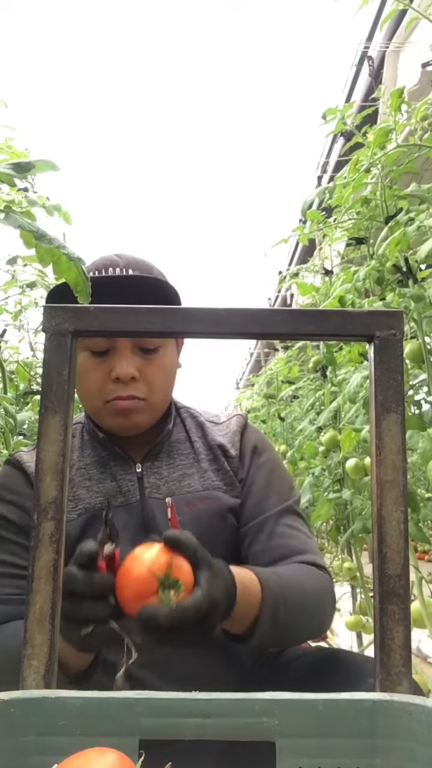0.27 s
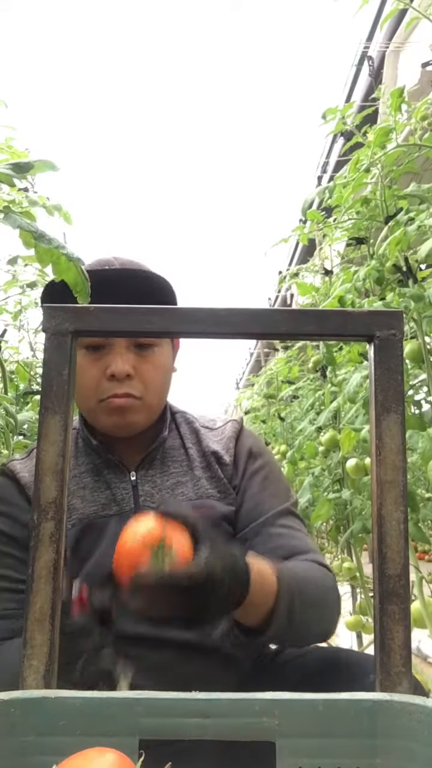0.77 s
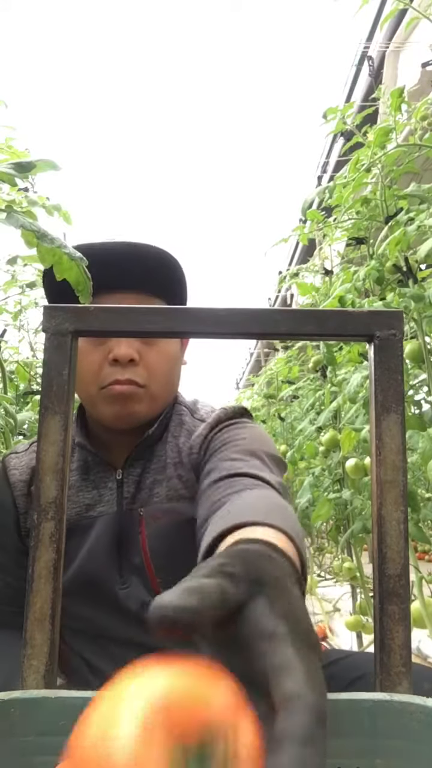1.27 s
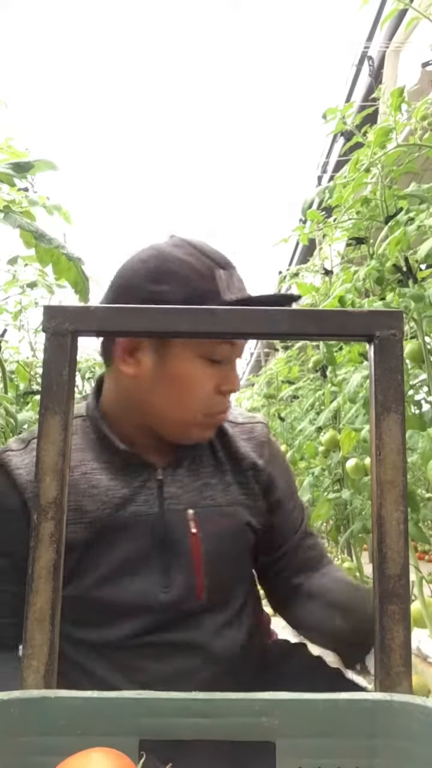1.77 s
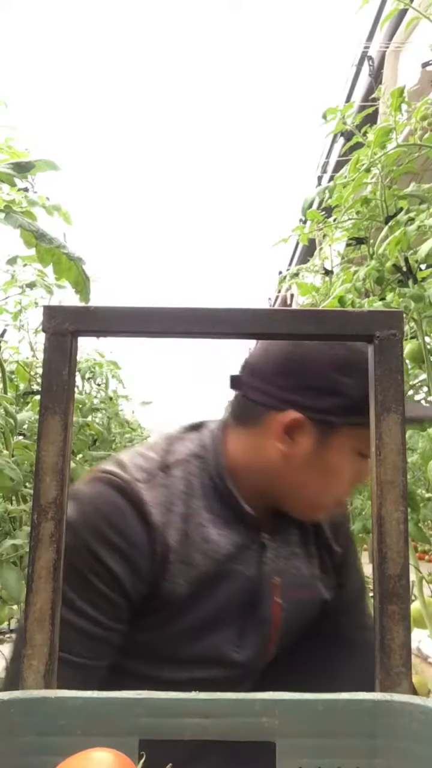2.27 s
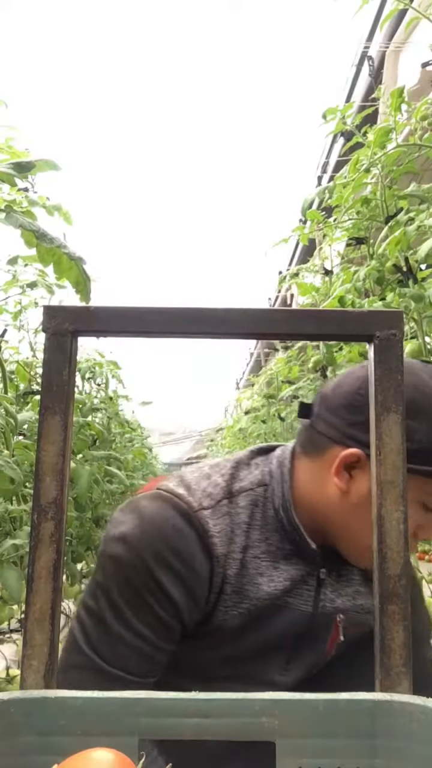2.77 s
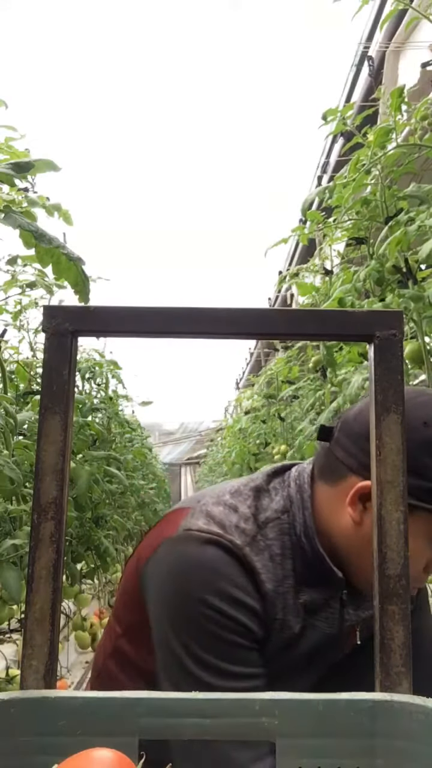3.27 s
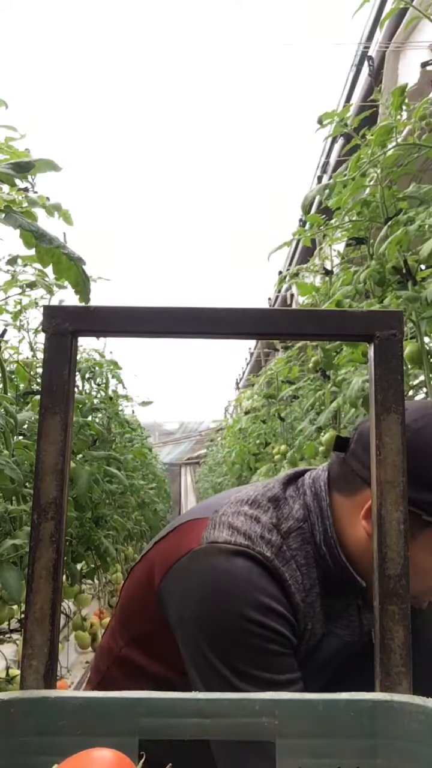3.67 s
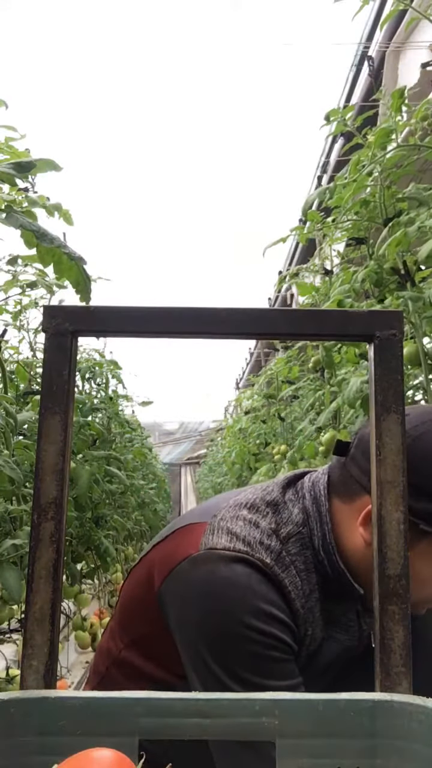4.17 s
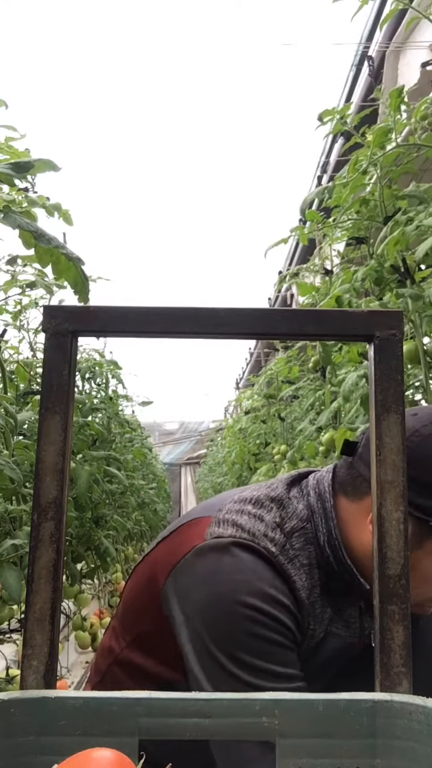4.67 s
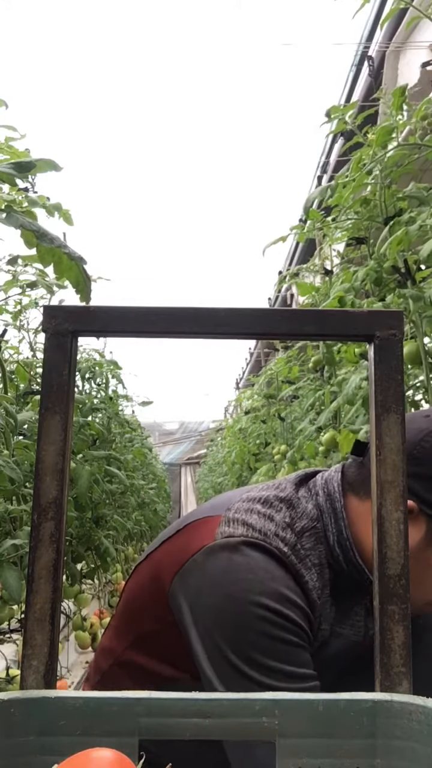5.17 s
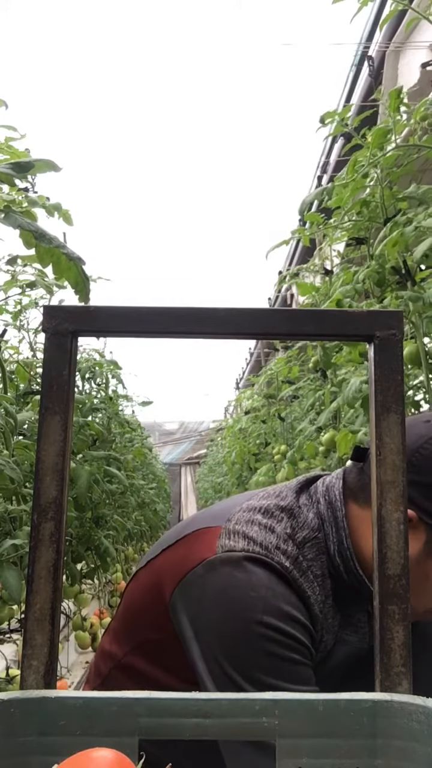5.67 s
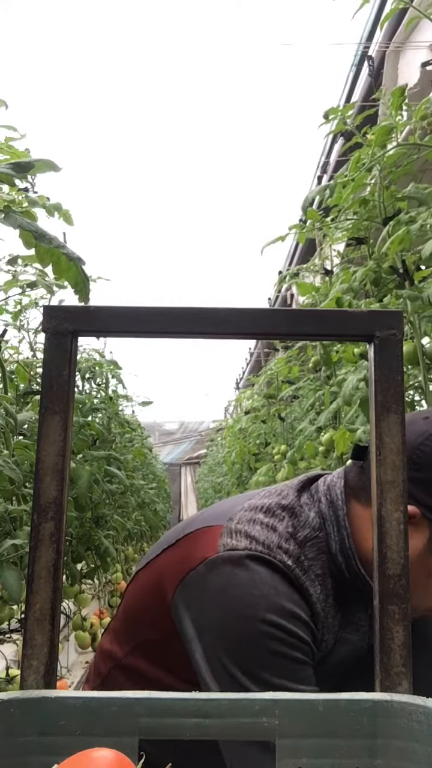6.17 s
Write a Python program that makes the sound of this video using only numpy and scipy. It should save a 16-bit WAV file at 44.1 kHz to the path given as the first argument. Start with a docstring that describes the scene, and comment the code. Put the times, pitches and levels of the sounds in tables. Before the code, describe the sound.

A tomato is set down in a plastic crate close to the microphone, making a quick cluster of dull thumps. Leaves swish, and everything dips in level for about a second. A little further off, shears cut two stalks about two seconds apart, each with a crisp crack and clack, with leafy rustling and tiny snaps between them. Distant greenhouse machinery hums softly underneath throughout.

```python
"""A low hum and a soft wash of air fill a greenhouse; sleeves rub and leaves rustle and tick. A picker sets a
tomato down in a plastic crate beside the microphone, where it bumps and rocks to rest. The level dips for a
second. He leans into the vines, an arm's length further off, and his shears crack through two stalks and clack
shut; each cut leaves the vine shaking."""
import sys
import numpy as np
from scipy import signal
from scipy.fft import rfft, irfft
from scipy.io import wavfile
from scipy.ndimage import uniform_filter1d

SR = 44100
rng = np.random.default_rng(int(sys.argv[2]) if len(sys.argv) > 2 else 0)


def file_out(sig):
    """Save sig as 16-bit WAV at sys.argv[1]."""
    # one column per channel
    cols = np.atleast_2d(sig).T
    # limit, then scale
    lim = np.clip(cols, -1, 1)
    pcm = np.round(lim * 32767).astype(np.int16)
    wavfile.write(sys.argv[1], SR, pcm)


N = 282681
TIME, RING = np.arange(N) / SR, np.arange(SR // 2) / SR  # seconds along the scene, and along one event
FLESH_HZ = 377  # low-pass corner of a blow from the tomato's soft flesh

# Spectrum of leaves and cloth rubbing: frequency_hz, level_db
LEAF_SPECTRUM = [(300, -29.5), (800, 0.5), (1500, 4), (1900, 0.5), (2650, 4.5), (3400, -4.5), (4500, -2),
                 (4900, -8.5), (5800, -2), (7500, -11), (9100, -13), (10300, -22), (11500, -19),
                 (15500, -28.5)]
# The tomato's knocks on the crate: start_s, skin_tap_db, tap_corner_hz, flesh_thud_db
TOMATO_KNOCKS = [(1.4240, -25.5, 1690, -15), (1.4408, -24, 610, -27), (1.4864, -13, 4400, -28),
                 (1.4954, -12.5, 1400, -7), (1.5075, -18, 910, -25), (1.5175, -22.5, 1100, -17),
                 (1.5289, -20.5, 920, -31), (1.5640, -32, 1610, -15.5), (1.5893, -18.5, 1040, -22),
                 (1.6022, -19.5, 790, -15)]
# The two cuts: shut_s, level_db, clack_hz, clack_db, stalk_pop_db, rebound_delay_s, slide_db
STALK_CUTS = [(4.2161, -22, 3250, 2.5, -1, .006, -51), (6.0235, -28.5, 3000, 11, -17, .0019, -47)]


def amp(db):
    """Decibels to gain."""
    return 10 ** (np.asarray(db) / 20)


def unit_rms(x):
    """Scales to an rms of one."""
    return x / np.sqrt(np.mean(x ** 2) + 1e-20)


def curve_at(points, hz):
    """Reads a table on a log-frequency axis."""
    table_hz, value = np.transpose(points)
    return np.interp(np.log(hz + 1), np.log(table_hz + 1), value)


def add(mix, start_s, sound):
    """Mixes a sound in at a time."""
    part = mix[round(start_s * SR):][:len(sound)]
    part += sound[:len(part)]


def colour(x, spectrum):
    """Gives noise or clicks a spectrum, at an rms of one."""
    gain = amp(curve_at(spectrum, np.fft.rfftfreq(len(x), 1 / SR)))
    return unit_rms(irfft(rfft(x) * gain, len(x)))


def rise(rise_s):
    """An envelope that climbs towards one."""
    return 1 - np.exp(-RING / rise_s)


def decay(t60_s):
    """An envelope that falls 60 dB in t60_s."""
    return np.exp(-np.log(1000) * RING / t60_s)


def burst(spectrum, t60_s):
    """Countless close modes struck at once: noise that dies away."""
    return colour(rng.standard_normal(len(RING)), spectrum) * decay(t60_s)


def ring(modes):
    """The distinct modes of a struck body, all starting together."""
    return sum(amp(db) * decay(t60_s) * np.sin(2 * np.pi * hz * RING) for hz, db, t60_s in modes)


def clack(hz, rise_s):
    """A few cycles of one heavily damped resonance."""
    return RING / rise_s * np.exp(1 - RING / rise_s) * np.sin(2 * np.pi * hz * RING)


def machinery(hum_hz=53.1, half_width_hz=11, hum_db=-58, air_db=-52.5):
    """Distant machinery: a narrow, wavering hum and a wash of moving air."""
    # The moving air: frequency_hz, level_db
    air_spectrum = [(15, -33), (25, -17), (43, -4), (70, -1), (90, -9.5), (135, -10.5), (240, -14.5),
                    (360, -21), (1060, -21), (1600, -27.5), (2630, -36), (3400, -42.5), (6000, -49.5),
                    (10300, -55), (15500, -63)]
    hz = np.fft.rfftfreq(N, 1 / SR)
    hum = irfft(rfft(rng.standard_normal(N)) / (1 + ((hz - hum_hz) / half_width_hz) ** 2), N)
    hum /= abs(signal.hilbert(hum)) ** 0.3  # partly evens out the swells
    return amp(hum_db) * unit_rms(hum) + amp(air_db) * colour(rng.standard_normal(N), air_spectrum)


def friction(size, slips_per_s=700, spread_db=-0.5, clump_s=0.0083, clump_db=4.5):
    """Tiny slips of uneven size arrive in clumps over a smooth rub."""
    slips = (rng.random(size) < slips_per_s / SR) * rng.choice([-1, 1], size)
    slips = slips * amp(spread_db * np.minimum(rng.exponential(1, size), 4))
    clumps = unit_rms(uniform_filter1d(rng.standard_normal(size), int(clump_s * SR)))
    return unit_rms(slips * amp(clump_db * np.clip(clumps, -2, 2))) + rng.standard_normal(size)


def rubbing(scuff_db=-53.5, shake_db=-53):
    """Sleeves rub throughout; the tomato's skin scuffs after each knock, the vine shakes after each cut."""
    # The sleeves as he works, turns away and reaches into the vines: time_s, level_db
    sleeve_levels = [(0, -68), (1.1, -70), (1.8, -64.5), (2.3, -67.5), (2.5, -76.5), (3.2, -75), (3.3, -71),
                     (4.0, -73), (5.6, -73.5), (6.41, -69.5)]
    power = amp(np.interp(TIME, *np.transpose(sleeve_levels))) ** 2
    scuff = amp(scuff_db) * rise(0.0036) * decay(0.35)
    shake = amp(shake_db) * rise(0.035) * decay(0.69)
    for start_s, *_ in TOMATO_KNOCKS:
        add(power, start_s, scuff ** 2)
    for shut_s, *_ in STALK_CUTS:
        add(power, shut_s, shake ** 2)
    return np.sqrt(power) * colour(friction(N), LEAF_SPECTRUM)


def leaf_strokes(skew=1.05):
    """Hands brush through the leaves: a light stroke is bright, a gripping one dull and crunchy."""
    # Strokes of hands and sleeves: peak_s, level_db, width_s, grip (0 to 1)
    strokes = [(.07, -65, 0.045, .15), (0.701, -65, 0.032, 0.1), (1.274, -59.5, 0.038, 0.37),
               (1.894, -51.5, 0.019, 0.43), (1.97, -47.5, 0.016, 0.28), (2.895, -59, 0.047, 0.46),
               (3.04, -65.5, 0.035, 0), (4.405, -56.5, 0.06, 0.58), (4.484, -56, 0.02, .7),
               (4.645, -56, 0.019, .55), (4.76, -56.5, 0.021, 0.76), (4.838, -53, 0.016, .9),
               (4.936, -57, 0.037, 0.25), (5.186, -54, 0.031, 0.16), (6.262, -53.5, 0.035, 0.77)]
    # Gripped leaves crunching: frequency_hz, level_db
    crunch_spectrum = [(1000, -39), (2000, -29), (2500, 3), (2800, -2.5), (3300, 0), (4200, -3.5),
                       (15000, -42)]
    out, t = np.zeros(N), RING - RING.mean()
    for peak_s, db, width_s, grip in strokes:
        slips = friction(len(t))
        tilt_db_per_octave = 4.5 - 5.5 * grip
        swish = colour(slips, [(hz, gain + tilt_db_per_octave * np.log2(hz)) for hz, gain in LEAF_SPECTRUM])
        crunch = amp(-25 + 31 * grip) * colour(slips, crunch_spectrum)
        swell = np.exp(-0.5 * (t / width_s * skew ** np.sign(t)) ** 2)  # builds slower than it stops
        stroke = amp(db) * unit_rms(swish + crunch) * swell
        add(out, max(peak_s + t[0], 0), stroke[peak_s + t >= 0])
    return out


def small_ticks(faint_count=20, faint_gap_s=0.3, focus_db_per_octave=6):
    """Tiny snaps of stalks and leaves, and one tick as the tomato grazes the crate."""
    # The clearest ticks, each strongest around its own pitch: start_s, level_db, pitch_hz
    clear_ticks = [(0.181, -44.5, 3800), (.285, -46, 1300), (.318, -52, 4470), (.563, -47.5, 3170),
                   (0.708, -41.5, 4950), (1.3023, -39, 3800), (1.3954, -29, 1210), (1.791, -47, 2920),
                   (3.26, -42, 7470), (3.267, -43, 2970), (3.574, -53.5, 5170), (3.864, -46, 4260),
                   (5, -45.5, 4040), (5.088, -46, 4940), (5.136, -41, 3700), (5.491, -51, 3060)]
    faint_ticks = [((k + when) * faint_gap_s, -63.5 + 6 * size, 4620 * 2 ** (pitch - 0.5))
                   for k, (when, size, pitch) in enumerate(rng.random((faint_count, 3)))]
    out = np.zeros(N)
    for start_s, db, hz in clear_ticks + faint_ticks:
        spectrum = [(f, gain - focus_db_per_octave * abs(np.log2(f / hz))) for f, gain in LEAF_SPECTRUM]
        snap = amp(-6.5) * burst(spectrum, t60_s=0.048) * rise(0.00136)
        add(out, start_s, amp(db) * (snap + amp(-9) * clack(hz, rise_s=0.00045)))
    return out


def tomato_blows(firm_db=-21.5, squash_s=0.0029, rock_start_s=1.6161, rock_period_s=0.0139):
    """The skin taps, the flesh thuds, and at last the fruit rocks to rest: start_s, level_db, corner_hz."""
    for start_s, tap_db, corner_hz, thud_db in TOMATO_KNOCKS:
        yield start_s, tap_db, corner_hz
        lag_s = squash_s * np.clip(1 + 0.06 * (firm_db - tap_db), 1, 2)  # gentle taps squash it slower
        yield start_s + lag_s, thud_db, FLESH_HZ
    for k in range(4):  # each beat weaker and duller
        yield rock_start_s + k * rock_period_s, -21 - 3.5 * k, 480 * 0.61 ** k


def crate(floor_hz=67):
    """Each blow pushes and rings the crate; the soft fruit spreads the force in time, dulling the ring."""
    # The plastic crate's modes: pitch_hz, level_db, t60_s
    crate_modes = [(65, -4, 0.21), (116.5, -4.5, 0.075), (150, -1.5, 0.13), (211, -5.5, 0.15),
                   (296, -19, 0.19), (399.6, -3.5, 0.13), (590, -11.5, 0.14), (647, -22, 0.041),
                   (722, -15.5, 0.16), (813, -7, 0.12), (867, -2, 0.053), (950, -7.5, 0.038),
                   (1085, -11.5, 0.074), (1180, -17, 0.047), (1312, -13.5, 0.053), (1504, -22, 0.044),
                   (2233, -8.5, 0.034), (2560, -16, 0.026)]
    # Its dense, short clatter: frequency_hz, level_db
    clatter_spectrum = [(40, -30), (90, -3.5), (200, 8), (480, -16), (900, -4.5), (1400, -8), (1800, -13.5),
                        (2800, -18.5), (3600, -31), (4500, -16.5), (6000, -30), (15000, -29)]
    out, modes = np.zeros(N), ring(crate_modes)
    for start_s, db, corner_hz in tomato_blows():
        body = amp(-9) * (modes + burst(clatter_spectrum, t60_s=0.064))
        # The wall gives way and swings back, most under soft blows.
        swing = RING / (0.00037 + 1 / (2 * np.pi * corner_hz))
        push = amp(4 - 2 * np.log2(corner_hz / FLESH_HZ)) * swing * (1 - swing / 2) * np.exp(-swing)
        blow = signal.lfilter(*signal.butter(2, corner_hz, fs=SR), body + push)
        blow /= np.sqrt(np.sum(blow ** 2) / (SR * 0.0049))  # equal energy, hard or soft
        add(out, start_s, amp(db) * blow)
    # An open crate radiates no deep bass.
    return signal.sosfilt(signal.butter(3, floor_hz, "high", fs=SR, output="sos"), out)


def level_dip(start_s=2.338, end_s=3.25, depth_db=-9, edge_s=0.013):
    """A gain that sinks, holds and comes back."""
    inside_s = np.minimum(TIME - start_s, end_s - TIME)
    return amp(depth_db * np.clip(inside_s / edge_s + 0.5, 0, 1))


def low_swells():
    """A soft low bump, and later a brief swell of the low hum."""
    # The bump and the swell: start_s, level_db, pitch_hz
    swells = [(3.262, -47.5, 175), (5.149, -39, 50.4)]
    out = np.zeros(N)
    for start_s, db, hz in swells:
        add(out, start_s, amp(db) * clack(hz, rise_s=0.0084))
    return out


def blade_contacts():
    """The blades bite twice and shut, the handles bounce: start_s, level_db, clack_hz, clack_db, pop_db."""
    # Bites into the stalk: before_shut_s, relative_level_db, clack_db
    bites = [(.0098, -15, -3), (.0068, -7, -1.5)]
    for shut_s, db, hz, clack_db, pop_db, rebound_s, _ in STALK_CUTS:
        for lead_s, bite_db, bite_clack_db in bites:
            yield shut_s - lead_s, db + bite_db, 4370, bite_clack_db, -14
        yield shut_s, db, hz, clack_db, pop_db
        yield shut_s + rebound_s, -24, 6400, -14, pop_db - 17


def shears(slide_s=0.023):
    """The blades slide, crack through the stalk and clack shut, leaving a faint ring of steel."""
    # The crack of the cut: frequency_hz, level_db
    crack_spectrum = [(150, -20), (600, -12), (1000, -8), (1500, -12), (2200, -4.5), (2900, 3.5), (4400, 0),
                      (5000, -3), (6500, 0.5), (9200, -6), (10200, -17), (11500, -11), (15500, -17)]
    # A thick stalk popping between the blades: pitch_hz, level_db, t60_s
    stalk_modes = [(1050, -20, 0.061), (1875, -17, 0.058), (2120, -11.5, 0.038), (2640, -14, 0.069),
                   (3620, -18, 0.043)]
    # The shears' modes: pitch_hz, level_db, t60_s
    steel_modes = [(2650, -33, 0.16), (2680, -26, .13), (3520, -23, 0.1), (4200, -27, 0.1),
                   (4550, -27.5, 0.16), (6320, -25, 0.11), (6860, -21, 0.11), (8630, -16, 0.11)]
    out, pop, steel = np.zeros(N), ring(stalk_modes), amp(-5) * ring(steel_modes)
    for start_s, db, hz, clack_db, pop_db in blade_contacts():
        crack = amp(-7) * burst(crack_spectrum, t60_s=0.05) * rise(0.0003)
        blades = amp(clack_db) * clack(hz, rise_s=0.00047)
        add(out, start_s, amp(db) * (crack + blades + amp(pop_db) * pop + steel))
    pressure = np.linspace(0, 1, round(slide_s * SR))
    for shut_s, *_, slide_db in STALK_CUTS:
        scrape = colour(rng.standard_normal(len(RING)), crack_spectrum)[:len(pressure)]
        add(out, shut_s - slide_s, amp(slide_db) * pressure * scrape)
    return out


def nearby(x):
    """The direct sound plus the ringing that it wakes in things close around the microphone."""
    # Their narrow resonances: pitch_hz, width_hz, level_db
    resonances = [(2450, 49, -11), (2900, 170, -11), (4534, 70, -3), (5420, 130, -9.5), (6380, 92, -3),
                  (7740, 83, -12), (8920, 140, -2.5)]
    return x + sum(amp(db) * signal.lfilter(*signal.iirpeak(hz, hz / width_hz, fs=SR), x)
                   for hz, width_hz, db in resonances)


def greenhouse(x):
    """Diffuse reflections; the foliage soaks up the treble sooner than the bass."""
    # Reverberation time: frequency_hz, t60_s
    reverb_times = [(60, 0.62), (300, 0.55), (1000, 0.19), (3000, 0.17), (7000, 0.33), (14000, 0.24)]
    hz, t, noise = signal.stft(rng.standard_normal(len(RING)), SR, nperseg=256)
    band_decay = np.exp(-np.log(1000) * t / curve_at(reverb_times, hz)[:, None])
    tail = signal.istft(noise * band_decay, SR)[1][:len(RING)] * rise(0.0063)
    return signal.fftconvolve(x, tail / np.linalg.norm(tail))[:N]


def scene():
    """One microphone: the crate is close and dry; shears and leaves are an arm's length further off."""
    thumps = amp(1) * crate()
    snips = amp(1) * nearby(shears())
    soft_sounds = nearby(rubbing() + leaf_strokes() + small_ticks() + low_swells())
    room = greenhouse(amp(-20) * thumps + amp(-13) * snips + amp(-12) * soft_sounds)
    return (thumps + snips + soft_sounds + room + machinery())[None]


def record(dry, hiss_db=-82, low_cut_hz=38.5, high_cut_hz=15850):
    """The brief dip in level, the microphone's hiss and bass cut, then the band limit."""
    # The microphone's own noise: frequency_hz, level_db
    hiss_spectrum = [(100, -12), (1500, 1), (4000, -2), (8000, -5), (10300, -6), (15500, -4.5)]
    mic = dry * level_dip() + amp(hiss_db) * colour(rng.standard_normal(N), hiss_spectrum)
    mic = signal.sosfilt(signal.butter(4, low_cut_hz, "high", fs=SR, output="sos"), mic)
    low_pass = signal.firwin(511, high_cut_hz, window=("kaiser", 9), fs=SR)
    return signal.oaconvolve(mic, low_pass[None], "same")


dry = scene()
out = record(dry)
file_out(out)
```